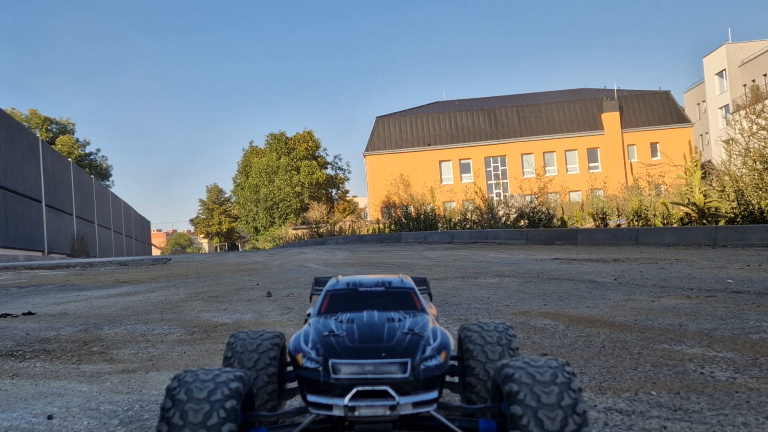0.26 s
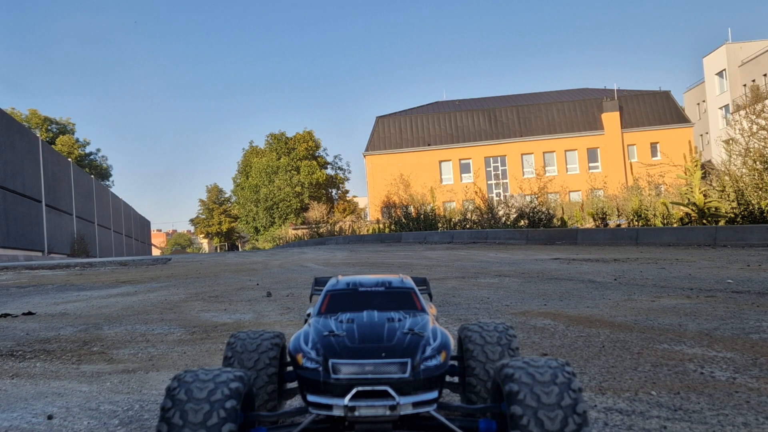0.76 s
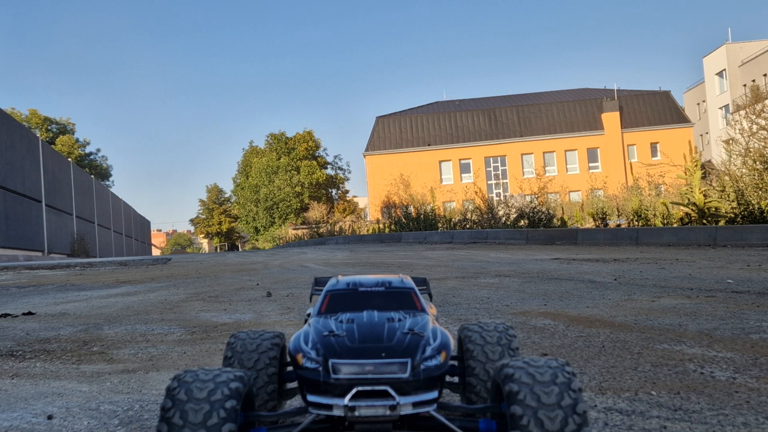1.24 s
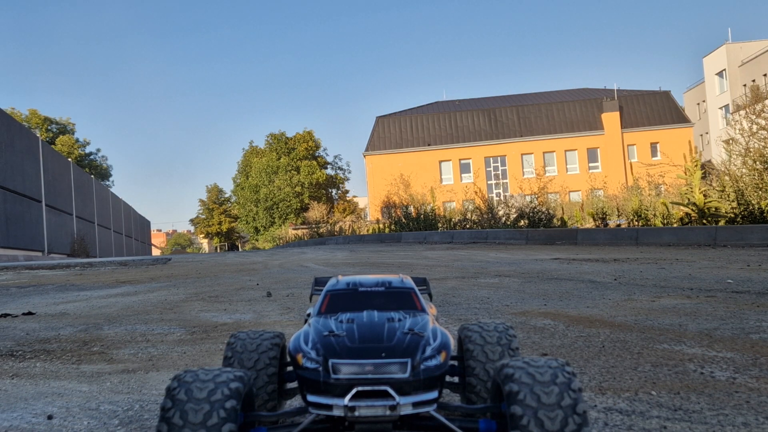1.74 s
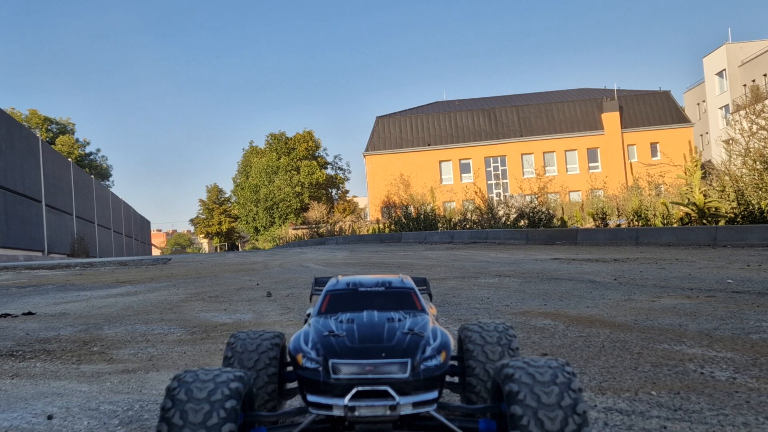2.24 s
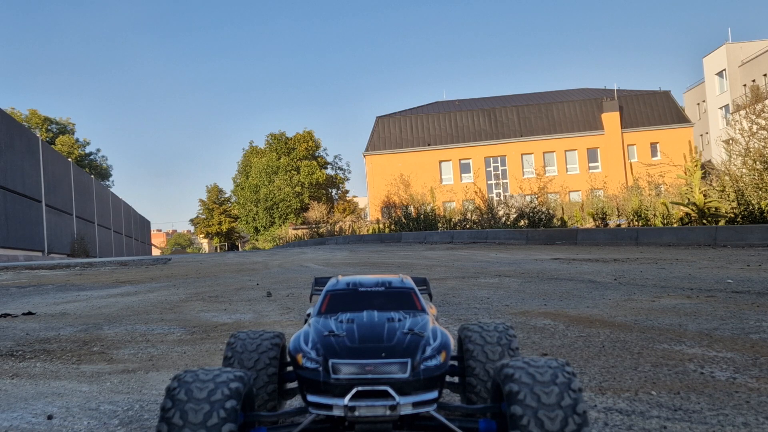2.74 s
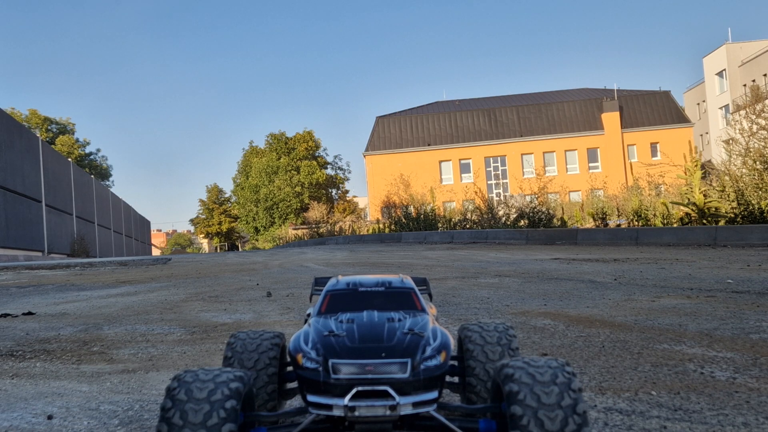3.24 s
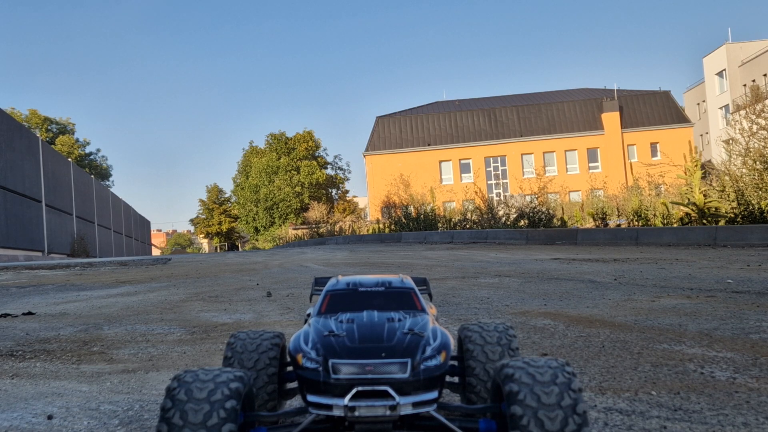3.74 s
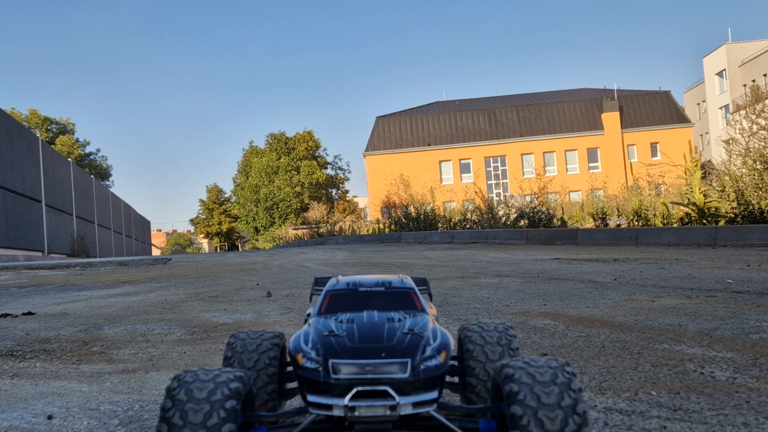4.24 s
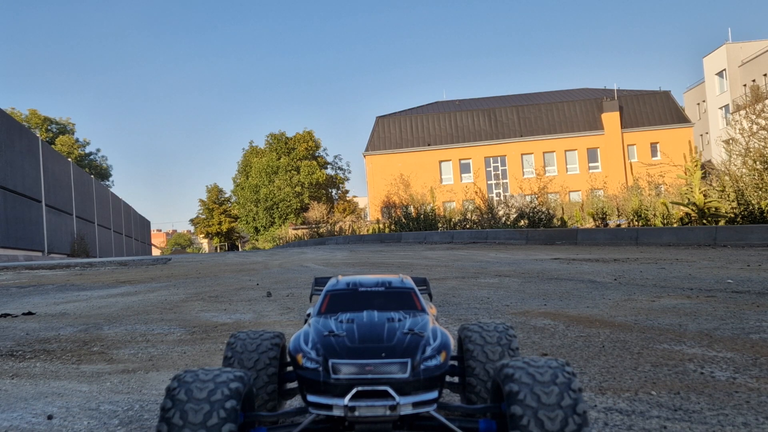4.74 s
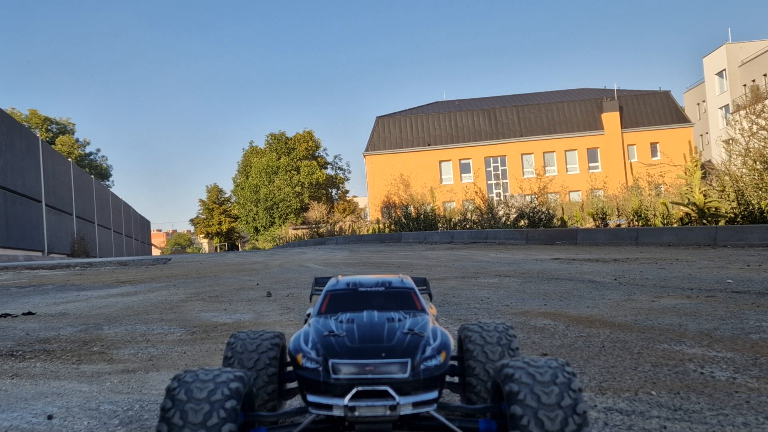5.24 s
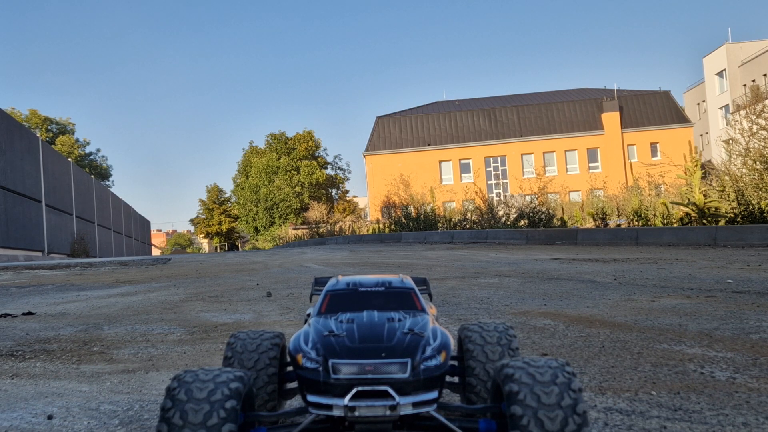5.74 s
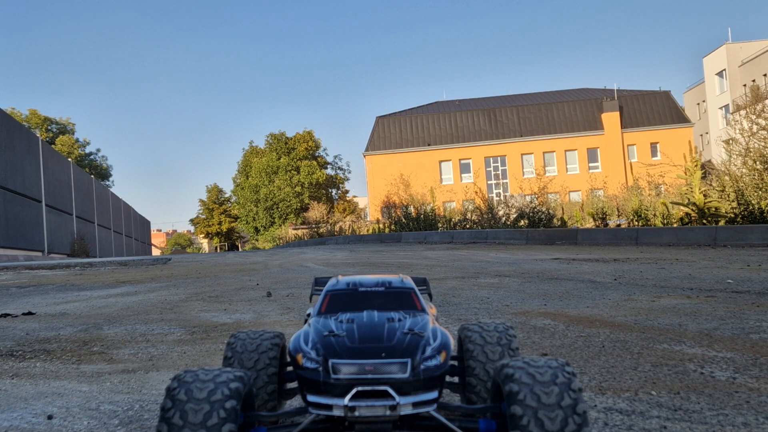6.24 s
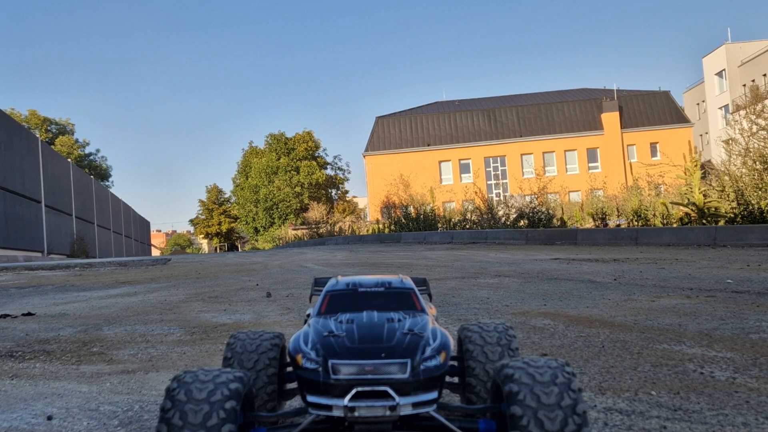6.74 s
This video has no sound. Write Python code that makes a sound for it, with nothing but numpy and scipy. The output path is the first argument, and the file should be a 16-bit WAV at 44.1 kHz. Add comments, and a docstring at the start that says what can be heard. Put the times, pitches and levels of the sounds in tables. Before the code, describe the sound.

Outdoors on a paved lot, a radio-controlled truck's tiny two-stroke engine idles close to a stereo microphone: a fast, raspy, hollow metallic buzz with irregular sharp cracks and hiss. At about 3.6 seconds it slows slightly and dies with a short puff. Faint rattles and creaks follow over low town traffic, while a vehicle approaches with a humming engine and swelling tyre noise. Small metallic pings sound near the end.

```python
"""A tiny two-stroke model engine idles close by on a paved lot: rows of modes ring at every turn, now and then
a firing cracks, amid gas hiss and a throb at the crank rate. It stalls with a puff: noise bursts, dull knocks.
A loose part rattles, then hot metal creaks and pings as it cools: decaying noise and ringing modes.
Behind it town traffic roars as shaped noise, a low drone swells as a wandering sine, and a larger vehicle
draws near with climbing engine harmonics and growing tyre noise."""
import sys
import numpy as np
from scipy import signal
from scipy.fft import rfft, irfft, next_fast_len
from scipy.io import wavfile
from scipy.ndimage import uniform_filter1d

SR = 44100
rng = np.random.default_rng(int(sys.argv[2]) if len(sys.argv) > 2 else 0)


def decibels_to_gain(level_db):
    """Convert a level in decibels to a linear amplitude gain (20 dB per decade)."""
    exponent = np.asarray(level_db, float) / 20
    return 10 ** exponent


def dump_mix(stems):
    """Bounce the given channels to the path in sys.argv[1] as a 16-bit WAV at rate SR."""
    frames = np.atleast_2d(stems).T  # one column per channel
    limited = np.clip(frames, -1, 1)  # hard clip at full scale
    pcm = np.round(limited * 32767).astype(np.int16)
    wavfile.write(sys.argv[1], SR, pcm)


N = 308259
T = np.arange(N) / SR
SIDES = np.array([[1], [-1]])  # left, right


def curve(table, column=1):
    """One column of a table, joined by straight lines in time."""
    rows = np.array(table, float)
    return np.interp(T, rows[:, 0], rows[:, column])


def colour(x, spectrum):
    """Shapes x by (Hz, dB) points, straight in log frequency, and brings it to rms 1."""
    hz, db = np.transpose(spectrum)
    size = next_fast_len(N)
    f = np.maximum(np.arange(size // 2 + 1) * SR / size, 1)
    gain = decibels_to_gain(np.interp(np.log(f), np.log(hz), db))
    y = irfft(rfft(x, size) * gain, size)[..., :N]
    return y / np.sqrt(np.mean(y ** 2))


def walk(rate_hz):
    """Random levels held 1 / rate_hz and slewed twice; spread near 1."""
    hold = int(SR / rate_hz)
    steps = np.repeat(rng.standard_normal(N // hold + 1), hold)
    return 1.624 * uniform_filter1d(uniform_filter1d(steps, hold), hold)[:N]


def ring(times_s, gains, hz, t60_s, pan_db, lead_rad, rise_s=.0001):
    """One decaying mode pushed for about rise_s at each time, with level and phase offsets between the sides."""
    pole = np.exp((2j * np.pi * hz - np.log(1000) / t60_s) / SR)
    at = np.ceil(times_s * SR).astype(int)
    blows = np.zeros(N, complex)
    np.add.at(blows, at, gains * pole ** (at - times_s * SR))  # exact to a fraction of a sample
    soft = np.exp(-1 / (rise_s * SR))
    blows = signal.lfilter([1 - soft], [1, -soft * pole], blows)
    mode = signal.lfilter([1], [1, -pole], blows)
    return (mode * decibels_to_gain(SIDES * pan_db / 2) * np.exp(SIDES * .5j * lead_rad)).imag


def burst(times_s, gains, decay_s):
    """Envelope that jumps at the given times and dies away exponentially."""
    jumps = np.zeros(N)
    np.add.at(jumps, (times_s * SR).astype(int), gains)
    return signal.lfilter([1], [1, -np.exp(-1 / (decay_s * SR))], jumps)


def spread(alike_hz, lag_samples):
    """Stereo noise: bass alike on both sides but late on the left, treble unrelated."""
    common, left, right = rng.standard_normal((3, N))
    late = np.interp(np.arange(N) - lag_samples, np.arange(N), common)
    apart = np.array([left, right])
    sos = signal.butter(1, alike_hz, fs=SR, output="sos")
    return signal.sosfilt(sos, np.array([late, common]) - apart) + apart


# Firings that ring the metal clearly. Each row: nominal time in seconds, strength in dB.
FIRINGS = [(0.0057, -26.5), (0.0334, -28.5), (0.0522, -25.0), (0.0888, -30.0), (0.1167, -24.0),
           (0.154, -22.5), (0.1811, -24.0), (0.208, -25.0), (0.2351, -29.5), (0.2452, -31.0),
           (0.2625, -29.5), (0.2808, -30.5), (0.29, -30.5), (0.3086, -26.5), (0.3368, -25.5),
           (0.3552, -31.5), (0.3646, -23.5), (0.3919, -18.5), (0.4176, -29.0), (0.4261, -30.5),
           (0.4539, -25.5), (0.4818, -31.0), (0.4912, -25.0), (0.5187, -26.0), (0.5466, -29.5),
           (0.5649, -30.0), (0.5838, -31.0), (0.6027, -27.5), (0.612, -21.5), (0.6397, -23.0),
           (0.6584, -29.0), (0.6675, -28.0), (0.7146, -25.5), (0.7427, -19.5), (0.7693, -28.0),
           (0.8246, -21.0), (0.8513, -28.5), (0.8794, -30.0), (0.9075, -31.5), (0.9172, -23.0),
           (0.9541, -21.5), (0.981, -23.0), (1.0087, -23.5), (1.0361, -26.0), (1.0639, -27.5),
           (1.0828, -29.0), (1.0924, -22.0), (1.1194, -23.5), (1.1469, -23.5), (1.1742, -31.5),
           (1.1835, -27.5), (1.2017, -31.5), (1.221, -22.5), (1.2488, -25.5), (1.2763, -31.0),
           (1.2856, -31.0), (1.3137, -22.5), (1.3411, -26.0), (1.3691, -24.0), (1.3967, -26.5),
           (1.4246, -22.5), (1.4522, -29.5), (1.4811, -24.5), (1.5093, -31.0), (1.5184, -29.5),
           (1.547, -22.5), (1.5655, -31.5), (1.5844, -24.0), (1.603, -31.0), (1.6222, -22.0),
           (1.6497, -20.5), (1.6769, -24.5), (1.686, -26.5), (1.7048, -31.5), (1.7144, -31.5),
           (1.7421, -25.0), (1.77, -28.5), (1.8077, -29.0), (1.8171, -30.5), (1.8267, -27.5),
           (1.8453, -31.5), (1.8646, -25.0), (1.8837, -24.5), (1.9028, -23.0), (1.9307, -18.5),
           (1.957, -30.5), (1.9663, -21.5), (1.9932, -25.0), (2.0027, -29.0), (2.0303, -24.5),
           (2.0583, -28.0), (2.0778, -31.5), (2.0874, -31.5), (2.1067, -27.5), (2.1258, -29.0),
           (2.1354, -21.5), (2.1624, -25.0), (2.2005, -22.0), (2.2195, -30.0), (2.248, -28.5),
           (2.268, -29.5), (2.2773, -22.0), (2.3054, -23.0), (2.333, -29.5), (2.3517, -26.0),
           (2.3707, -29.5), (2.3805, -30.0), (2.3995, -28.5), (2.4286, -20.0), (2.4651, -23.0),
           (2.4933, -22.0), (2.5124, -30.0), (2.5222, -20.5), (2.5495, -24.5), (2.5678, -26.5),
           (2.5863, -31.5), (2.606, -30.5), (2.6155, -24.0), (2.6445, -26.0), (2.6541, -28.5),
           (2.6838, -21.0), (2.7117, -30.0), (2.7214, -21.0), (2.7493, -31.0), (2.7592, -25.0),
           (2.7885, -25.5), (2.8078, -27.5), (2.8272, -28.0), (2.8466, -31.0), (2.8672, -24.5),
           (2.887, -23.5), (2.9066, -25.0), (2.926, -24.0), (2.9547, -21.0), (2.9832, -27.5),
           (2.9927, -27.5), (3.0126, -23.5), (3.0316, -27.0), (3.0513, -23.0), (3.0704, -27.0),
           (3.0902, -22.0), (3.1193, -23.0), (3.1385, -26.5), (3.1583, -22.0), (3.1866, -24.0),
           (3.2165, -22.0), (3.2461, -27.5), (3.2563, -23.0), (3.2865, -22.0), (3.3164, -22.5),
           (3.3457, -24.5), (3.3762, -22.0), (3.405, -27.5), (3.4157, -25.5), (3.448, -25.5),
           (3.4707, -24.0), (3.5045, -21.5), (3.5386, -20.5), (3.5848, -20.5)]
# Mean crank speed. Each row: time in seconds, turns per second.
SPEED = [(0, 108), (2.4, 106), (3.3, 100), (3.45, 92), (3.6, 86)]
# Unlit turns after the last firing: nominal times in seconds.
COAST_S = [3.5948, 3.6072]
# Base chance that a turn lights its charge 1, 2, 3, 4 or more turns after the last firing.
IGNITION = [.1, .15, .3, .6]
LEANING = .05  # chance added on the second turn, reached at the stall
FULL_BURN_DB = -19.5  # strength at burn 1
WEAK_DB, WEAK_SCATTER_DB = -40.5, 0.5  # faint firings
TRACE_DB, TRACE_SCATTER_DB = -45.5, 3  # unlit turns
KICK, KICK_KEEP = 0.064, 0.855  # share of speed gained from a burn of 1, share of it left a turn later


def crank(early_s=.0003):
    """Time and burn of every turn: charge lights by chance between loud firings, each burn kicks the flywheel."""
    fired_s, fired_db = np.transpose(FIRINGS)
    marks_s = np.r_[fired_s[0] - 1 / SPEED[0][1], fired_s]
    counts = np.round(np.diff(marks_s) * np.interp(fired_s, *np.transpose(SPEED))).astype(int)
    total = counts.sum()
    loud = np.cumsum(counts) - 1
    luck, sizes = rng.random(500), rng.standard_normal((500, 2))
    burn, durations, waited, excess = [], [], 2, 0.
    for k in range(total):
        is_loud = k in loud
        chance = IGNITION[min(waited, 3)] + (waited == 1) * LEANING * (k / total) ** 3
        lights = luck[k] < chance and not is_loud
        if is_loud:
            level_db = fired_db[np.searchsorted(loud, k)]
        elif lights:
            level_db = WEAK_DB + WEAK_SCATTER_DB * sizes[k, 0]
        else:
            level_db = TRACE_DB + TRACE_SCATTER_DB * sizes[k, 1]
        waited = 0 if lights or is_loud else waited + 1
        durations.append(1 / (1 + excess))
        burn.append(decibels_to_gain(level_db - FULL_BURN_DB))
        excess = KICK_KEEP * excess + KICK * burn[-1]
    # whole turns fit between the loud firings
    clock = np.cumsum(durations)
    times_s = np.interp(clock, np.r_[0, clock[loud]], marks_s)
    return np.r_[times_s, COAST_S] - early_s, np.r_[burn, 0, 0]


# Antiresonances of silencer and body shell. Each row: Hz, width in Hz, depth in dB.
DIPS = [(267, 197, -10.5), (880, 67, -12), (1267, 95, -18), (2080, 34, -8), (2240, 52, -6),
        (2844, 110, -13), (5690, 240, 0)]


def dips(x):
    """Takes the antiresonances out of x, one band after another."""
    for hz, width_hz, db in DIPS:
        band = signal.lfilter(*signal.iirpeak(hz, hz / width_hz, fs=SR), x)
        x = x - (1 - decibels_to_gain(min(db, 0))) * band
    return x


# Silencer and chassis modes. Each row: Hz, t60 in seconds, gain on a plain turn in dB, gain on a full firing in dB,
# returning wave relative to the first in dB, left minus right in dB, left's lead in radians.
BODY = [(327, 0.023, -24, -23.5, -34, 3, 0.33), (488, 0.015, -15, -18, -23, 1.4, 0.42),
        (727, 0.018, -22, -18, -43, -1, 0.46), (1065, 0.028, -22, -25.5, -4, -2.5, -0.63),
        (1173, 0.11, -55, -33, -23, 13.5, -2.2), (1457, 0.031, -23, -16.5, -11, 7.5, -0.28),
        (1573, 0.029, -23, -17, -9, -5.5, 1.34), (1659, 0.045, -25.5, -19, -28, 10.5, 0.67),
        (1853, 0.049, -35, -27.5, -7, 6.5, 0.83), (1970, 0.12, -58, -41, -10, -3, 0.95),
        (2264, 0.052, -36, -35.5, -10, -13, -1.4), (2413, 0.036, -38.5, -24.5, -5, -2, 0.41),
        (2518, 0.052, -52, -26, -4, 4, 2.2), (2940, 0.065, -48.5, -40, 8.5, 1, 1.9),
        (3300, 0.025, -45, -49, 10.5, 4, 0.85), (3930, 0.044, -51, -49, -25, -8, 0.0036),
        (5060, 0.021, -62, -29, -6, -7, -0.3), (5370, 0.022, -54, -36, 13, -3, -2.4),
        (5499, 0.024, -66, -17, -13, 7.5, 0.32)]
# The low thump comes with the rebound, the pipe rings at once, the shell a moment later.
# Each row: modes up to Hz, delay in seconds, sign on a plain turn.
ARRIVAL = [(400, -.0006, 1), (600, .00024, 1), (1600, 0, -1), (16000, .00025, -1)]
SUCK_LATE_S = .00009
LIT_FROM, LIT_FULLY = .1, .2  # burn at which suction turns to pressure
METAL_FROM_HZ, PIPE_LAW, METAL_LAW = 2000, 0.33, 0.67  # growth of pipe and metal ring with burn (powers)
SLOW_LAW = 1.07  # growth of the low thump with the length of a turn (power)
RISE_S, FIN_FROM_HZ, FIN_RISE_S = .00006, 4500, .0006  # the cooling fins take up the blow slowly


def body_ring(times_s, burn, period_s):
    """The port opens: an unlit turn sucks at the silencer, a burn cracks into it, and the wave comes back once."""
    out = 0
    waver = rng.standard_normal(len(times_s))
    unlit = np.interp(burn, [LIT_FROM, LIT_FULLY], [1, 0])
    for hz, t60_s, plain_db, fired_db, back_db, pan_db, lead_rad in BODY:
        late_s, sign = next(row[1:] for row in ARRIVAL if hz < row[0])
        chance = rng.standard_normal((len(times_s), 4)).T
        crack = burn ** PIPE_LAW * (1 - unlit) if hz < METAL_FROM_HZ else burn ** METAL_LAW
        main = (sign * decibels_to_gain(plain_db) * unlit + decibels_to_gain(fired_db) * crack) * decibels_to_gain(1.2 * chance[0])
        if hz < 1200:
            main = main * (period_s * SPEED[0][1]) ** SLOW_LAW
        back = main * decibels_to_gain(back_db + 2 * chance[1])
        # every blow comes a part of a cycle early or late
        first_s = times_s + late_s + SUCK_LATE_S * unlit + .00003 * waver + .03 * chance[2] / hz
        back_s = first_s + .53 * period_s + .00015 * chance[3]
        rise_s = RISE_S if hz < FIN_FROM_HZ else FIN_RISE_S
        out = out + ring(np.r_[first_s, back_s], np.r_[main, back], hz, t60_s, pan_db, lead_rad, rise_s)
    return dips(out)


# Pressure swing at the crank rate. Each row: multiple, peak level in dB.
THROB = [(1, -26.5), (2, -36.5), (3, -39)]


def crank_throb(times_s):
    """Pressure swings in step with the crank; lowest during the blow."""
    turns = np.interp(T, times_s, np.arange(len(times_s)))
    return -sum(decibels_to_gain(db) * np.cos(2 * np.pi * k * (turns - .15)) for k, db in THROB)


# Gas hiss with the intake whistles. Each row: Hz, relative density in dB.
GAS = [(600, -3.5), (1500, 4.5), (3000, -6), (4500, -17), (6500, -11.5), (7700, -8), (9000, -15),
       (10300, -8.5), (11500, -20.5), (13500, -18), (15600, -17.5)]


def gas_hiss(times_s, burn, period_s, running):
    """Noise in three parts: the intake spits before the port opens, each burn blasts after it, a steady hiss runs."""
    scatter = decibels_to_gain(3 * rng.standard_normal(len(times_s) - 1))
    opening_s = (times_s + .68 * period_s)[:-1]
    spit = uniform_filter1d(burst(opening_s, decibels_to_gain(-25.5) * scatter, 0.00052), size=40)
    blast = uniform_filter1d(burst(times_s + 0.0018, decibels_to_gain(-30.0) * burn, 0.005), size=60)
    gas = colour(spread(9500, 1.32), GAS) * decibels_to_gain(SIDES * 1.16)
    return gas * (spit + blast + decibels_to_gain(-37.0) * running)


def model_engine():
    """One crank drives the ringing body, the throb and the gas; throb and steady hiss fade after the last turn."""
    times_s, burn = crank()
    period_s = np.gradient(times_s)
    running = np.interp(T, [times_s[-1] + 0.0029, times_s[-1] + 0.015], [1, 0])
    body = body_ring(times_s, burn, period_s)
    return body + running * crank_throb(times_s) + gas_hiss(times_s, burn, period_s, running)


# Puffs of the stall, then creaks. Each row: start in seconds, level in dB, decay in seconds, centre in Hz,
# left minus right in dB.
PUFFS = [(3.618, -21, 0.004, 5500, 7), (3.621, -23, 0.0038, 13000, 2), (3.629, -36.5, 0.019, 2800, 4),
         (3.657, -51, 0.019, 6160, -2), (3.673, -41.5, .012, 3470, 5), (3.7, -58, 0.2, 2940, 9),
         (3.787, -54, .008, 3000, 8), (3.833, -49.5, 0.009, 3180, 3), (3.93, -61, 0.019, 4300, 5),
         (3.742, -58, .015, 7000, 4), (3.815, -60, 0.016, 5000, 1), (4.04, -61, 0.011, 4500, 7),
         (4.574, -53.5, 0.016, 2985, 19), (4.588, -50, 0.0053, 3020, 11), (5.198, -40, 0.004, 3200, 0),
         (5.207, -32.5, 0.0036, 1693, 4), (5.234, -42, .0015, 1598, 0), (6.883, -49, .08, 3400, -5),
         (6.939, -57, .08, 3560, -3)]
PUFF_FALL_DB_PER_OCTAVE = 11.5


def puffs_and_creaks():
    """Noise bursts that peak at a centre frequency and die away exponentially."""
    out = 0
    for start_s, db, decay_s, hz, pan_db in PUFFS:
        top_db = -PUFF_FALL_DB_PER_OCTAVE * np.log2(16000 / hz)
        noise = colour(spread(3400, 0), [(200, -20), (hz, 0), (16000, top_db)])
        out = out + noise * burst(np.array([start_s]), decibels_to_gain(db), decay_s) * decibels_to_gain(SIDES * pan_db / 2)
    return out


# Dull knocks. Each row: start in seconds, level in dB.
THUMPS = [(3.618, -43.5), (4.588, -44)]


def thumps():
    """A single low mode, quickly damped."""
    at_s, db = np.transpose(THUMPS)
    return ring(at_s, decibels_to_gain(db), 150, 0.025, 0, 0)


# Blows on a small loose part after the stall. Each row: start in seconds, level in dB.
RATTLES = [(3.632, -56), (3.675, -59), (3.765, -57), (3.81, -59), (3.86, -57)]
# Its modes. Each row: Hz, t60 in seconds, relative level in dB.
PART = [(3770, 0.12, -2), (4030, 0.083, -11), (3030, .1, -5)]


def loose_part():
    """Each blow sets off all modes of the part, softly."""
    at_s, db = np.transpose(RATTLES)
    return sum(ring(at_s, decibels_to_gain(db + mode_db), hz, t60_s, 4, 0, .002) for hz, t60_s, mode_db in PART)


# Pings of cooling metal. Each row: start in seconds, level in dB, left minus right in dB.
PINGS = [(4.885, -58.5, 14), (6.883, -40, -3), (6.942, -46, -2)]
# Modes of that metal. Each row: Hz, t60 in seconds, relative level in dB.
FIN = [(3490, .24, 0), (3524, .24, -2), (4861, .1, -10), (6500, .05, -5), (7660, .06, -14)]


def cooling_pings():
    """Each ping sets off all modes of the metal."""
    out = 0
    for start_s, db, pan_db in PINGS:
        for hz, t60_s, mode_db in FIN:
            out = out + ring(np.array([start_s]), decibels_to_gain(db + mode_db), hz, t60_s, pan_db, 0)
    return out


def wall_echo(near):
    """Echo off fence and house fronts: decaying noise taps from 30 ms on, t60 0.4 s."""
    t = T[:SR // 2]
    walls = decibels_to_gain(-59) * (t > .03) * np.exp(-np.log(1000) * t / .4) * rng.standard_normal((2, len(t)))
    return signal.fftconvolve(near, walls, axes=1)[:, :N]


# Mean level of the nearing vehicle's tyres before the echo. Each row: time in seconds, level in dB.
APPROACH = [(4.3, -60.5), (4.8, -59.5), (5.3, -57), (5.7, -49.5), (6.0, -44), (6.3, -42.5), (6.6, -41),
            (6.85, -39), (6.99, -35.5)]
# The vehicle's engine. Each row: time in seconds, mean firing rate in Hz, level in dB before the emergence.
VEHICLE = [(3.3, 149.5, -32.5), (3.46, 153, -38), (3.53, 162.6, -35), (3.68, 156.3, -37),
           (4.32, 179.3, -44.5), (5.16, 208.4, -39), (5.63, 215.3, -41), (6.95, 216.7, -35.5),
           (6.99, 223, -38)]
# Its notes. Each row: multiple of the firing rate, relative level in dB, growth with nearness in dB per dB of tyres.
ORDERS_FAR = [(.5, -1, 0.33), (1, 0.5, 0.033), (1.5, -7.5, 0.37), (2, -35, 0.47), (2.5, -24, .5),
              (2.759, -16.5, 0.34)]


def vehicle_engine():
    """Harmonics of a wavering firing rate, each growing by its own share as the tyres near."""
    phase = 2 * np.pi * np.cumsum(curve(VEHICLE) * (1 + 0.0032 * walk(20))) / SR
    tyre_db = curve(APPROACH)
    nearness_db = tyre_db - tyre_db[-1]
    notes = 0
    for k, db, grow in ORDERS_FAR:
        notes = notes + decibels_to_gain(db + grow * nearness_db + 1.2 * walk(9)) * np.sin(k * phase)
    # the note only emerges from behind the houses after three seconds
    emerge_db = np.interp(T, [2.9, 3.4], [-18, -1])
    return np.sqrt(2) * notes * decibels_to_gain(curve(VEHICLE, 2) + emerge_db) * decibels_to_gain(SIDES * 1.9)


# The vehicle's tyre noise. Each row: Hz, relative density in dB.
TYRES = [(240, -51.5), (400, -12), (598, -5.5), (687, -16), (852, -5.5), (1200, -2.5), (1960, -15.5),
         (2550, -18), (2970, -17), (3500, -16.5), (4310, -22.5), (4700, -18.5), (5270, -20.5),
         (6200, -25.5), (7400, -28), (7900, -28), (8370, -32.5), (12700, -39), (16000, -51)]


def vehicle_tyres():
    """Growing noise; an echo comes ever sooner behind it, so its bands slide up."""
    hiss = colour(spread(2150, 13.7), TYRES)
    late = np.arange(N) - SR * np.interp(T, [5.0, 6.99], [.00075, .0006])
    echo = np.array([np.interp(late, np.arange(N), side) for side in hiss])
    level = decibels_to_gain(curve(APPROACH) + .6 * walk(12) + 1.2 * walk(4))
    return level * (hiss + .18 * echo)


# Low drone. Each row: time in seconds, mean Hz, mean rms level in dB.
RUMBLE = [(0.0, 71, -30), (0.11, 69.4, -37), (0.74, 68.6, -38), (0.88, 83.8, -29), (1.17, 80.6, -35),
          (1.36, 77.9, -24.5), (1.52, 77.2, -30), (1.6, 69.46, -33.5), (2.69, 67.7, -37.5),
          (3.31, 67.96, -33.5), (5.63, 67.4, -38.5), (5.68, 65.6, -27), (5.74, 63.2, -40),
          (6.03, 62.07, -26.5), (6.89, 64.75, -36.5), (6.99, 60.6, -60)]


def low_drone():
    """A sine whose level and pitch wander."""
    level = decibels_to_gain(curve(RUMBLE, 2) + 2.1 * walk(14))
    hz = curve(RUMBLE) * (1 + 0.03124 * walk(14))
    return np.sqrt(2) * level * np.sin(2 * np.pi * np.cumsum(hz) / SR)


# Distant traffic. Each row: Hz, relative density in dB.
TOWN = [(15, -56), (25, -24), (52, -5), (70, -4.5), (130, -15.5), (175, -14.5), (236, -24.5), (309, -25.5),
        (427, -31), (659, -30), (936, -29), (2050, -42), (2410, -48.5), (2840, -59), (16000, -83)]


def town_roar():
    """Shaped noise with a slightly wavering level; the left side's lag grows."""
    level = decibels_to_gain(-33.0 + 0.37 * walk(3.04) + 0.48 * walk(21))
    lag_samples = np.interp(T, [4.2, 6.2], [5, 13])
    return level * colour(spread(400, lag_samples), TOWN)


def scene():
    """Near sources, their echo, and the traffic."""
    near = model_engine() + puffs_and_creaks() + thumps() + loose_part() + cooling_pings()
    near = near + wall_echo(near)
    return near + town_roar() + low_drone() + vehicle_engine() + vehicle_tyres()


def top_cut(x):
    """Nothing passes above the cut-off."""
    return signal.sosfilt(signal.butter(12, 15900, fs=SR, output="sos"), x)


def record(dry):
    """The microphones drop the deepest bass, below 32 Hz."""
    mix = signal.sosfilt(signal.butter(2, 32, "high", fs=SR, output="sos"), dry)
    return top_cut(mix)


dry = scene()
out = record(dry)
dump_mix(out)
```